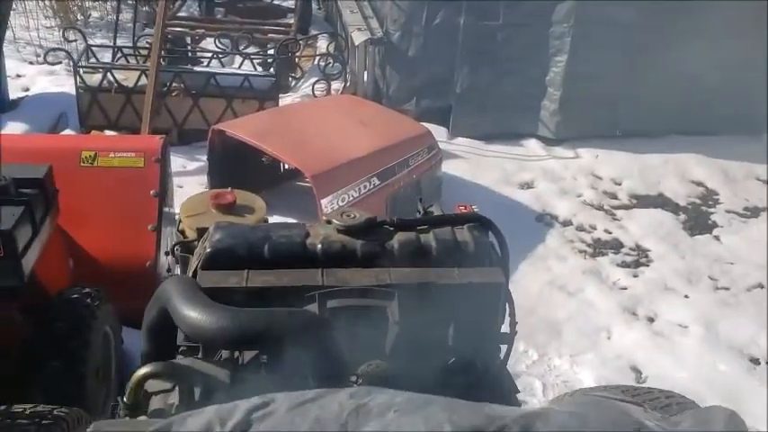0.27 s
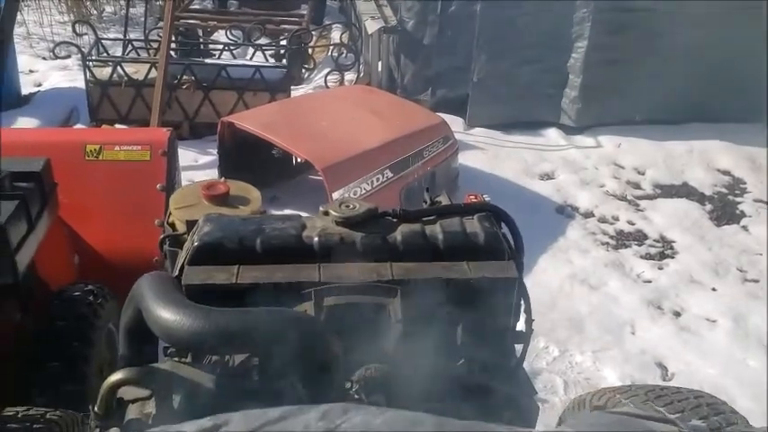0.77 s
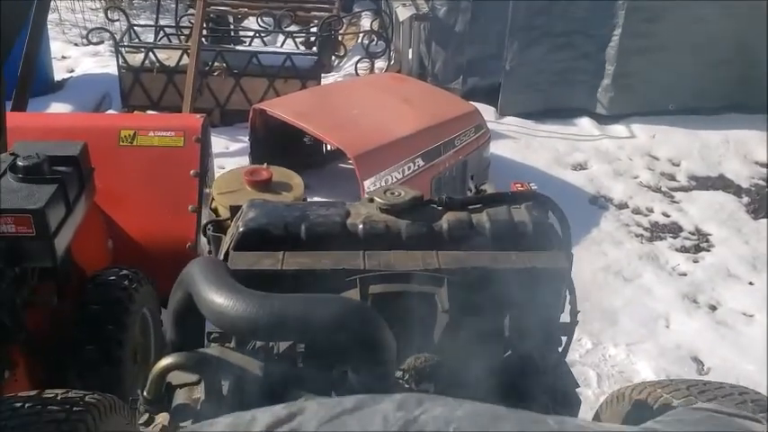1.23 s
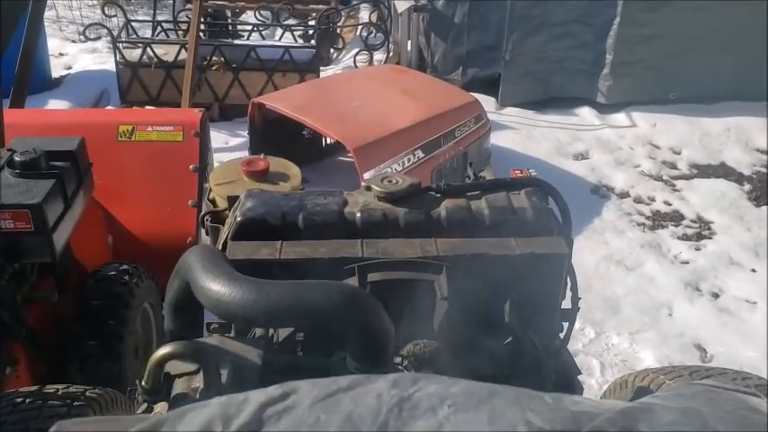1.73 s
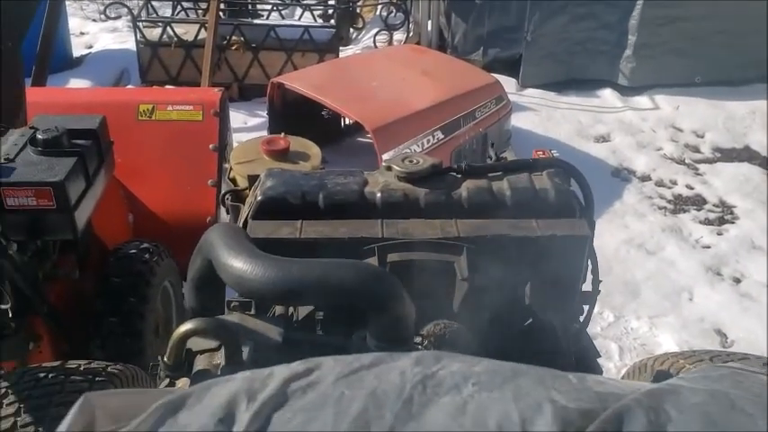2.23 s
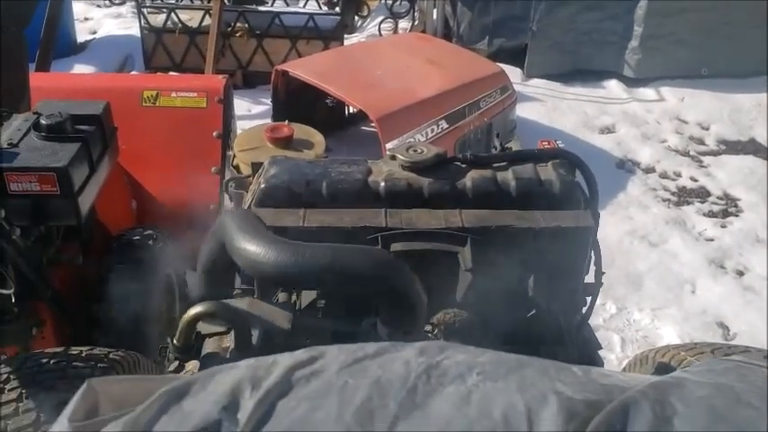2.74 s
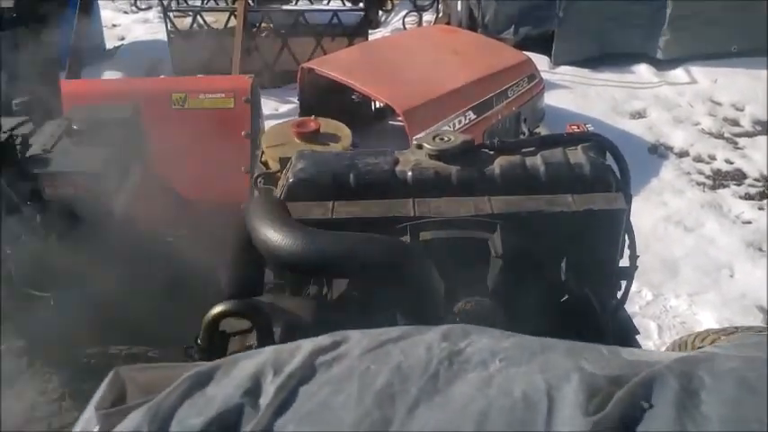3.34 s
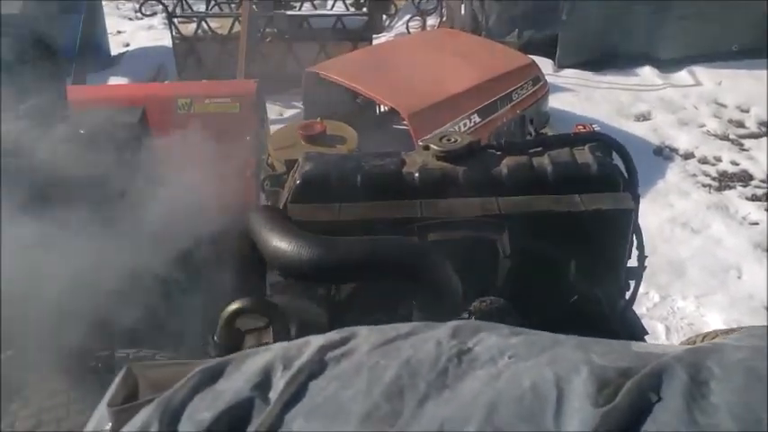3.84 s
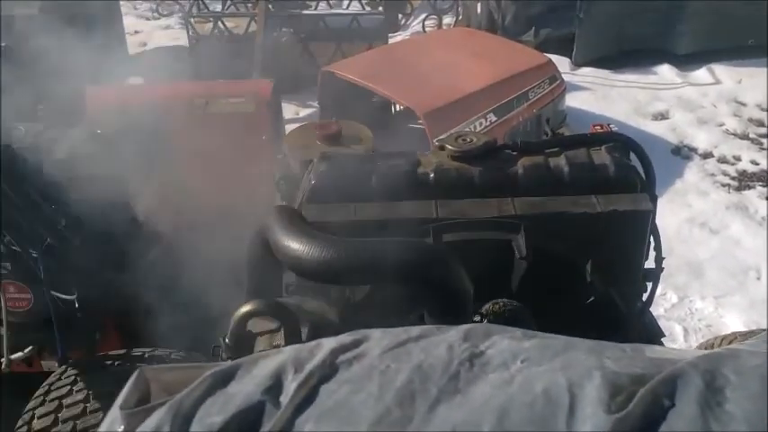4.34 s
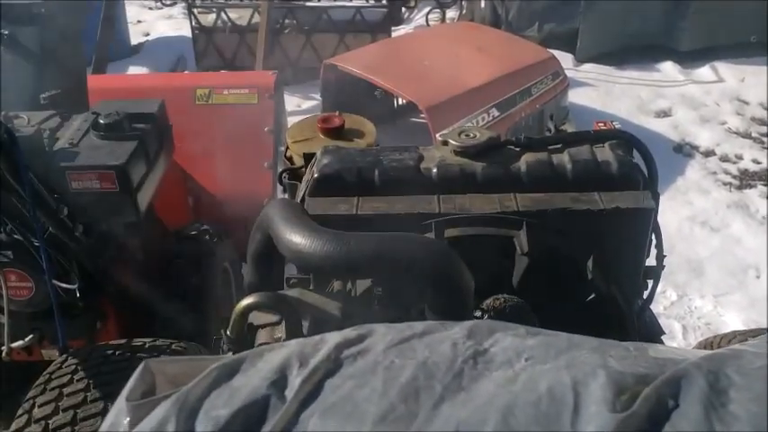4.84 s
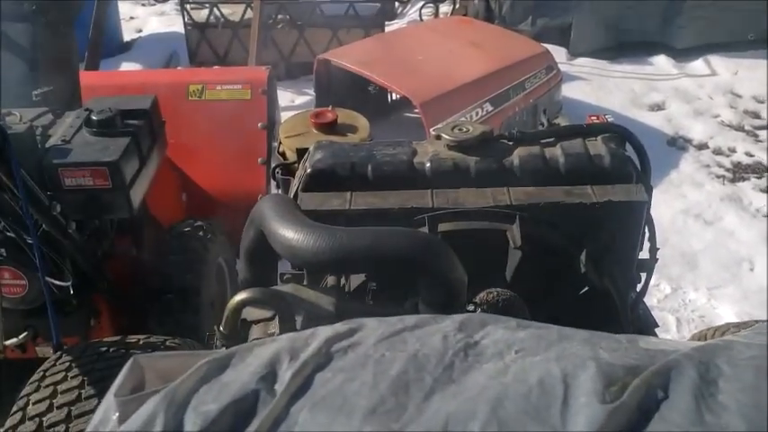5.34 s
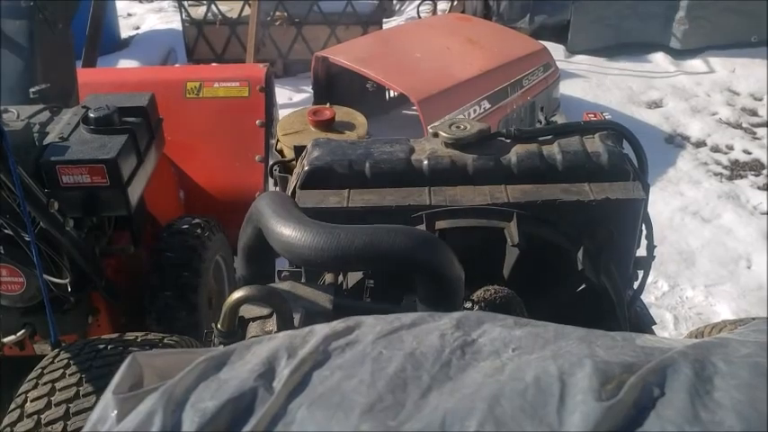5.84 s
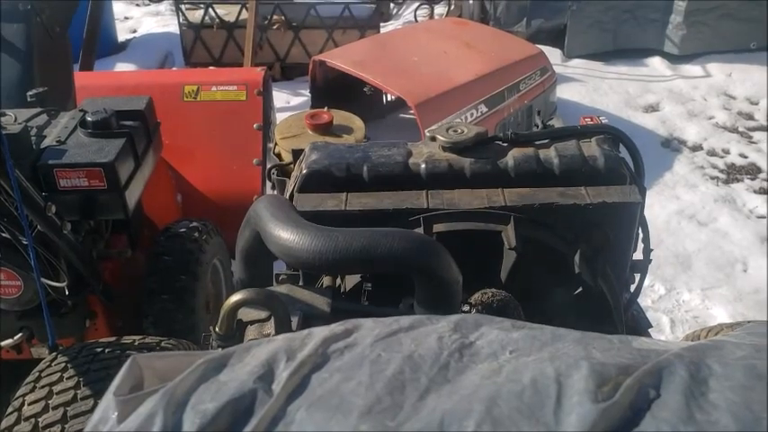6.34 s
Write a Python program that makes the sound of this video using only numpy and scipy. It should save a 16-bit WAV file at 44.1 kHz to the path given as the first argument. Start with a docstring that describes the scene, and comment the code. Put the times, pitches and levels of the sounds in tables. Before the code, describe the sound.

Outdoors, over a low distant drone, a hand rustles softly. Close by, a starter engages and rasps through two slow compressions. The cold diesel engine fires in a short run of knocking, whooping chugs, with jangling panels, sharp metal ticks and a thin high squeal. It slows and dies in weak puffs without catching, leaving the drone and a few faint ticks.

```python
"""Outdoors in the snow, over a low distant drone, a cold diesel engine is cranked close by.
The starter's teeth rasp and howl through two compressions, then the cylinders fire in a short run:
each firing knocks, rings the block, jangles loose panels and sends a rising whoop down the exhaust.
A dry rubbing part squeals thinly, and the engine runs down in weak puffs without catching.
Small metal ticks and the rustle of a hand come before and after."""
import sys
import numpy as np
from scipy import signal
from scipy.fft import rfft, irfft
from scipy.io import wavfile

SR = 44100
rng = np.random.default_rng(int(sys.argv[2]) if len(sys.argv) > 2 else 0)


def log_audio(samples):
    """Write samples as a 16-bit WAV file to the path given in sys.argv[1]."""
    # one column per channel
    frames = np.atleast_2d(samples).T
    # limit to full scale, then quantise
    limited = np.clip(frames, -1, 1)
    pcm = np.round(limited * 32767).astype(np.int16)
    wavfile.write(sys.argv[1], SR, pcm)


N = 291060
TIME = np.arange(N) / SR
FREQS = np.fft.rfftfreq(N, 1 / SR)

# Levels in the tables are relative: each layer sets its own trim on top.
# noise colours of the drone, the hiss and the hand: f/Hz, density/dB
DRONE_COLOUR = [(15, -47), (25, -12), (54, -3), (97, -12.5), (124, -7), (203, -9), (273, -8), (301, -14.5),
                (340, -10.5), (404, -8.5), (543, -6.5), (786, -22.5), (889, -17.5), (1380, -27),
                (9000, -51), (11700, -82), (19800, -120)]
HISS_COLOUR = [(4120, -37), (7000, -22), (8580, -17), (11500, 3.5), (15000, -11.5), (16000, -22)]
RUSTLE_COLOUR = [(2350, -15.5), (4000, -16), (8600, -22.5), (9940, -10), (11700, -2.5), (13300, -10),
                 (15000, -18), (16000, -10)]
# noise colours of metal snaps, valve gear, starter teeth and combustion: f/Hz, density/dB
TICK_COLOUR = [(410, -36), (700, 1.5), (1810, 11.5), (2590, -7), (3610, 9), (4320, -2), (5670, -4.5),
               (8700, -54.5), (12000, -8), (15600, -44), (22000, -120)]
CLATTER_COLOUR = [(350, -40.5), (600, -5), (997, -10), (1510, -6), (1680, -12), (1830, -9), (2040, -9.5),
                  (5050, -11), (8390, -19.5), (11800, -5.5), (12500, -9.5), (13600, -12), (16000, -18.5)]
GEAR_COLOUR = [(290, -42), (500, -19), (688, -16), (893, -6), (1020, -15), (1190, -5), (1300, -21),
               (1480, -9.5), (1930, -23.5), (2500, -19.5), (5020, -20.5), (7420, -33.5), (11800, -22.5),
               (13600, -25), (16000, -39)]
KNOCK_COLOUR = [(260, -34), (450, -2.5), (694, -5.5), (1070, -28), (1750, -18.5), (2260, -16), (2550, -10),
                (3700, -18.5), (4430, -12.5), (4770, -19.5), (5460, -14.5), (8540, -22), (11300, -5.5),
                (16000, -18)]
# stereo placing of the open air, the starter and the engine: f/Hz, left minus right/dB
AIR_PAN = [(60, -5.5), (110, 1.5), (200, -7), (380, -5), (700, -2.5), (1290, 4.5), (2380, 7), (4400, -6.5),
           (8120, -16), (15000, -13.5)]
GEAR_PAN = [(60, -6.0), (110, -1), (200, -5.0), (380, -1), (700, -7), (1290, 2.5), (2380, 11.5),
            (4400, -4.5), (8120, -8), (15000, -6)]
ENGINE_PAN = [(60, -4.5), (110, -2.5), (200, -5.5), (380, -8), (700, -8), (1290, 2), (2380, 6), (4400, -2),
              (8120, -7), (15000, -6.5)]
# how alike the two ears hear a noise: f/Hz, correlation
EAR_LIKENESS = [(60, 0.86), (200, 0.95), (640, 0.66), (1400, 0), (3000, 0), (15000, 0.048)]
# fader ride of the outdoor bed: t/s, level/dB
BED_RIDE = [(0, -46.5), (.5, -43.5), (1.08, -37), (1.9, -36.5), (4.4, -46.5), (6.15, -44), (6.56, -39.5)]
# hum lines on one slow pulse, as from a distant idling motor: harmonic number, level/dB
HUM_LINES = [(5, -13.5), (7, -14), (9, -14), (11, -15.5), (12, -7), (16, -7.5), (17, -17.5), (21, -17),
             (23, -19), (34, -27)]
# spells of handling rustle: t/s, level/dB, length/s
RUSTLE_CUES = [(1.158, -38.5, 0.032), (1.232, -44.5, 0.089), (1.382, -42.5, 0.012), (1.768, -40.5, 0.03),
               (1.83, -44.5, 0.17), (4.08, -58, 0.043), (5.158, -59, 0.023), (5.56, -54, .005)]
# dry metal ticks: t/s, level/dB, left minus right/dB, snap t60/s, ring f/Hz, ring against snap/dB
TICK_CUES = [(0.818, -29.5, -23, 0.01, 1060, -7.5), (2.726, -29, 5, 0.08, 1500, -1),
             (2.873, -24, -3, 0.014, 1790, -12), (3.3699, -19.5, -22, 0.0035, 3600, -17),
             (3.4586, -19, -29, 0.0059, 3680, -30), (3.5643, -19, -17, 0.0076, 4430, -16),
             (3.6642, -35, -11, 0.018, 1480, -22), (4.2875, -50.5, -5, 0.079, 1540, 5),
             (4.587, -51.5, -9, 0.018, 2550, -6), (6.033, -42.5, -9, 0.016, 3760, -4)]
# dull blows to the frame: t/s, level/dB
CLUNK_CUES = [(.8174, -48), (1.961, -27), (2.566, -29.5), (2.728, -33), (4.287, -40.5), (6.034, -45)]
# faint thread of rubbing between the squeals: t/s, level/dB
RUB_RIDE = [(2.78, -58), (3.1, -53), (3.55, -53), (3.67, -43), (3.76, -59), (3.88, -49), (4.0, -57)]
# the chassis shaking: t/s, level/dB
SHAKE_RIDE = [(1.9, -77), (1.97, -35.5), (2.15, -44.5), (2.3, -44), (2.6, -34.5), (3.7, -37), (4.1, -43),
              (4.4, -47.5)]
# clatter as the engine turns, then runs down: t/s, level/dB
CLATTER_RIDE = [(2.48, -48.5), (2.57, -45.5), (3.05, -45.5), (3.6, -50.5), (3.85, -54), (4.12, -61.5),
                (4.32, -79)]
# the starter spinning lightly between compressions: t/s, level/dB
SPIN_RIDE = [(1.94, -57), (2.2, -51), (2.55, -51), (2.62, -46)]
# the starter labouring through compressions: t/s, length/s, level/dB, howl peak t/s, howl level/dB
GRIND_CUES = [(1.957, .2, -34, 2.097, -31), (2.234, 0.15, -32, 2.394, -28)]
# pinion clashing with the ring gear: t/s, level/dB, length/s
CLASH_CUES = [(1.938, -37.5, 0.0054), (1.955, -33, 0.0053), (2.562, -32, 0.018), (2.581, -38.5, 0.021)]
# resonances of the starter housing and the engine block: f/Hz, width/Hz, level/dB
HOUSING_MODES = [(892, 24, -4.5), (1076, 27, -9), (1496, 32, -5.5), (2630, 440, -17), (3560, 73, -15.5),
                 (4140, 24, -15.5), (4660, 44, -15)]
BLOCK_MODES = [(1187, 57, 7.5), (1480, 58, -11), (1695, 28, 3), (2610, 64, 3), (2920, 40, -9),
               (4440, 220, -1.5), (5380, 83, -9.5)]
# strokes that only push air out: t/s, thump level/dB, ring level/dB, pipe f/Hz, ring t60/s
PUFF_CUES = [(2.337, -19, -24.5, 116, 0.35), (3.079, -28, -20, 117.2, 0.24), (3.372, -21, -23.5, 130, 0.5),
             (3.684, -23, -24.5, 123.8, 0.57), (4.043, -26.5, -22.5, 120, .36),
             (4.224, -23.5, -22, 175, 0.079), (4.48, -38, -33, 115, 0.36)]
# firing strokes: t/s, level/dB, pipe f/Hz as the valve opens, stroke length/s, knock/dB, squeal/dB
CHUG_CUES = [(2.533, -27, 129.7, 0.13, -52, -65), (2.6856, -17, 157, 0.083, -25.5, -55),
             (2.8032, -15, 139.5, 0.072, -29, -34), (2.899, -17, 148.2, .063, -32.5, -33.5),
             (2.99, -14.5, 166, 0.051, -21, -39), (3.1831, -17, 150, 0.068, -32.5, -37),
             (3.279, -15.5, 169.7, 0.054, -22, -36), (3.484, -18, 147, 0.0696, -35.5, -53),
             (3.582, -15.5, 166.3, .06, -23, -45), (3.812, -20.5, 144.5, 0.086, -39, -37),
             (3.925, -17.5, 166.2, 0.071, -23, -45)]
# envelope of one exhaust stroke: share of the stroke, level/dB
VALVE_ENVELOPE = [(0, 7.5), (.13, 7), (.3, 5), (.55, 3), (.8, 3), (.92, 0.5), (1.05, -18), (1.3, -12.5),
                  (1.7, -38)]

HARD_KNOCK_DB = -21  # the knock that others are weighed against
GRIND_RISE_S = 0.0053


def amp(db):
    """Decibels to gain."""
    return 10 ** (np.asarray(db) / 20)


def unit(x):
    """Scales a sound so that its mono mix has rms 1."""
    return x / np.sqrt(np.mean(np.atleast_2d(x).mean(0) ** 2) + 1e-20)


def curve(points):
    """A table over frequency, joined on a log axis."""
    hz, value = np.transpose(points)
    return np.interp(np.log(FREQS + 1), np.log(hz + 1), value)


def ride(rows):
    """A fader ride as a gain, silent outside its span."""
    return amp(np.interp(TIME, *np.transpose(rows), left=-200, right=-200))


def pan(db):
    """Left and right gains for a level difference; positive leans left."""
    pair = np.array([amp(np.atleast_1d(db) / 2), amp(-np.atleast_1d(db) / 2)])
    return pair / pair.mean(0)


def wander(rate_hz):
    """A smooth random modulator of rms 1."""
    lowpass = 1 / (1 + (FREQS / rate_hz) ** 4)
    return unit(irfft(rfft(rng.standard_normal(N)) * lowpass, N))


def ringing(modes):
    """Gain over frequency of resonances given as f/Hz, width/Hz, level/dB."""
    powers = (amp(db) ** 2 / (1 + (2 * (FREQS - hz) / width) ** 2) ** 2 for hz, width, db in modes)
    return np.sqrt(sum(powers))


def noise(gain, placing):
    """Coloured stereo noise, alike at both ears in the bass."""
    left, other = rfft(rng.standard_normal((2, N)))
    likeness = curve(EAR_LIKENESS)
    right = likeness * left + np.sqrt(1 - likeness ** 2) * other
    return unit(irfft(np.array([left, right]) * gain * pan(curve(placing)), N))


def bursts(rows, rise_s, fall_s):
    """Attack, hold and decay envelopes for cues given as t/s, level/dB, length/s."""
    return sum(amp(db) * np.clip((TIME - s) / rise_s, 0, 1)
               * np.exp(-np.maximum(TIME - s - length, 0) / fall_s) for s, db, length in rows)


def add(mix, s, sound):
    """Mixes a sound in at a time."""
    part = mix[round(s * SR):][:len(sound)]
    part += sound[:len(part)]


def firings(lead_s=0.012, lead_s_per_db=.00022):
    """Time and level of each combustion knock; a harder one comes earlier before the valve opens."""
    return [(s - lead_s - lead_s_per_db * (db - HARD_KNOCK_DB), db) for s, _, _, _, db, _ in CHUG_CUES]


def outdoors(drone_db=-1.3, hiss_db=-26, pulse_hz=25.65, drift=0.00301, waver=.22):
    """The bed: a distant drone with gently wavering hum lines, and a thin hiss that swells with it."""
    turns = pulse_hz * np.cumsum(1 + drift * wander(rate_hz=2.09)) / SR
    hum = np.zeros(N)
    for harmonic, db in HUM_LINES:
        gain = amp(db) * np.sqrt(2) * (1 + waver * wander(rate_hz=2.6))
        hum += gain * np.sin(2 * np.pi * (harmonic * turns + rng.random()))
    drone = amp(drone_db) * noise(amp(curve(DRONE_COLOUR)), AIR_PAN)
    hiss = noise(amp(curve(HISS_COLOUR)), AIR_PAN) * amp(hiss_db + 1.4 * wander(rate_hz=23))
    swell = amp(np.interp(TIME, *np.transpose(BED_RIDE)))
    return swell * (drone + hiss + pan(-7.0) * hum)


def rustles(trim_db=-2.5, grain_db=5):
    """Crisp little scrapes of a hand, close on the right."""
    grains = unit(amp(grain_db * np.minimum(wander(rate_hz=180), 1.8)))
    friction = noise(amp(curve(RUSTLE_COLOUR)), AIR_PAN) * grains
    return amp(trim_db) * friction * bursts(RUSTLE_CUES, rise_s=0.0016, fall_s=0.01)


def ticks(trim_db=-5, ring_t60=0.06):
    """Loose metal parts snap once and ring briefly at one pitch."""
    centred = [(100, 0), (10000, 0)]
    bright = noise(amp(curve(TICK_COLOUR)), centred)
    out = np.zeros((2, N))
    for s, db, pan_db, snap_t60, hz, ring_db in TICK_CUES:
        age = np.clip(TIME - s, 0, 1)
        snap = bright * amp(-60 * age / snap_t60) * (age > 0)
        ring = amp(ring_db - 60 * age / ring_t60) * np.sin(2 * np.pi * hz * age)
        out += pan(pan_db) * amp(db + trim_db) * (snap + ring)
    return out


def clunks(trim_db=-4, knock_db=-12, delay_s=0.0075, hold_s=.006):
    """Heavier blows and the combustion knocks shake a dull clunk out of the frame."""
    frame = noise(ringing([(324, 180, 1), (565, 89, -2), (806, 90, -2), (1123, 200, -4)]), ENGINE_PAN)
    blows = list(CLUNK_CUES) + [(s + delay_s, db + knock_db) for s, db in firings()]
    envelope = bursts([(s, db, hold_s) for s, db in blows], rise_s=0.0014, fall_s=0.022)
    return amp(trim_db) * frame * envelope


def steel_chatter(hz, spread_octaves, ring_s, count):
    """A brief chatter on thin steel: a random handful of modes around one pitch."""
    t = np.arange(SR // 12) / SR
    detune, size, phase, late = rng.standard_normal((4, count, 1))
    age = np.maximum(t - .003 * abs(late), 0)
    mode_hz = np.minimum(hz * 2 ** (spread_octaves * detune), SR / 3)
    modes = amp(2 * size) * np.sin(2 * np.pi * (mode_hz * age + phase))
    envelope = np.minimum(age / 0.0032, 1) * np.exp(-age / ring_s)
    return np.sum(modes * envelope, 0) / np.sqrt(count)


def jangles(trim_db=5, panel_hz=2352, clash_hz=2400, scatter_octaves=.12, rebound_s=.04, rebound_db=-7):
    """Firings, late gear clashes and puffs shake loose panels, differently each time and at each ear."""
    def clatter_db(s):
        """Level of the turning engine: the panels settle as it runs down."""
        return np.interp(s, *np.transpose(CLATTER_RIDE))
    struck = [(s, clatter_db(s) + 15 + .2 * (db - HARD_KNOCK_DB), panel_hz) for s, db in firings()[1:]]
    fallen_back = [(s + rebound_s, db + rebound_db, hz) for s, db, hz in struck]
    clashed = [(s, db + 2, clash_hz) for s, db, _ in CLASH_CUES[2:]]
    puffed = [(s + rebound_s, clatter_db(s) + 4, panel_hz) for s, *_ in PUFF_CUES]
    out = np.zeros((2, N))
    for s, db, hz in struck + fallen_back + clashed + puffed:
        hz = hz * 2 ** (scatter_octaves * rng.standard_normal())
        for ear in out:
            chatter = steel_chatter(hz, spread_octaves=0.28, ring_s=0.0065, count=10)
            add(ear, s + .002, amp(db + trim_db) * chatter)
    return pan(7.9) * out


def squeal(trim_db=-2, hz=12625, width_hz=150, delay_s=0.028, stroke_share=0.26, lead_s=0.028):
    """A dry rubbing part sings one very high note in snatches, in step with the strokes."""
    note = noise(ringing([(hz, width_hz, 0)]), ENGINE_PAN)
    after_valve = [(s + delay_s, db, stroke_share * stroke) for s, _, _, stroke, _, db in CHUG_CUES]
    # a fainter chirp ahead of the firing, only while the engine turns fastest
    before_firing = [(s - lead_s, db - 5, .011) for s, *_, db in CHUG_CUES[3:9]]
    snatches = bursts(after_valve + before_firing, rise_s=0.0018, fall_s=0.0056)
    thread = ride(RUB_RIDE) * unit(amp(1.5 * wander(rate_hz=30)))
    return amp(trim_db) * note * (snatches + thread)


def clatter(grain_db=2.0, sing_db=-10.0):
    """Valve gear rattles while the engine turns, the block sings faintly, and the chassis shakes."""
    rattle = noise(amp(curve(CLATTER_COLOUR)), ENGINE_PAN) * unit(amp(grain_db * wander(rate_hz=135)))
    sing = noise(ringing([(1515, 50, 7.0), (4670, 81, -6.0), (5070, 110, -5)]), ENGINE_PAN)
    sing *= unit(amp(3.3 * wander(rate_hz=12)))
    chassis = noise(ringing([(56.7, 38, 6.0), (135, 230, 1.0), (243, 280, 2.0)]), ENGINE_PAN)
    return ride(CLATTER_RIDE) * (rattle + amp(sing_db) * sing) + ride(SHAKE_RIDE) * chassis


def starter_load(swell_db=1.5):
    """The load on the starter sets in quickly, grows through each compression and then lets go."""
    load = ride(SPIN_RIDE)
    for s, length, db, _, _ in GRIND_CUES:
        progress = np.clip((TIME - s) / length, 0, 1)
        grind = bursts([(s, db, length)], GRIND_RISE_S, fall_s=0.066)
        load = np.maximum(load, amp(swell_db * (progress - 1)) * grind)
    return load


def starter_scrape(trim_db=-0.5, scatter_db=1.8, span_s=(1.96, 2.45), catches=55):
    """Teeth catch at random moments while the starter grinds."""
    out, load = np.zeros((2, N)), starter_load()
    for s, chance in zip(rng.uniform(*span_s, catches), rng.standard_normal(catches)):
        gain = amp(trim_db + scatter_db * chance) * load[int(s * SR)]
        for ear in out:
            add(ear, s, gain * steel_chatter(hz=2700, spread_octaves=0.65, ring_s=0.0063, count=4))
    return pan(3.9) * out


def starter_howl(free_hz=1075, loaded_hz=861, sag_s=0.0295, recover_s=0.027,
                 swell_db_per_s=133, fade_db_per_s=330, jitter=0.0398, rough=0.66, left_lead_s=0.0002):
    """Meshing teeth sing a rough note that sags under load and recovers past the compression."""
    out, flutter = np.zeros((2, N)), 1 + jitter * wander(rate_hz=170)
    for s, length, _, peak_s, db in GRIND_CUES:
        sag = np.exp(-np.maximum(TIME - s, 0) / sag_s)
        recovery = np.clip((TIME - s - length) / recover_s + .5, 0, 1)
        hz = (loaded_hz + (free_hz - loaded_hz) * (sag + recovery)) * flutter
        turns = np.cumsum(hz) / SR + hz * left_lead_s * np.array([[1], [0]])
        below_peak_db = np.maximum(swell_db_per_s * (peak_s - TIME), fade_db_per_s * (TIME - peak_s))
        attack = np.clip((TIME - s) / GRIND_RISE_S, 0, 1)
        out += amp(db - below_peak_db) * attack * np.sqrt(2) * np.sin(2 * np.pi * turns)
    return pan(-2) * out * (1 + rough * wander(rate_hz=130))


def starter_rasp(rasp_db=-4.5, housing_db=-9, clash_db=1, shaft_hz=36, tooth_hz=130, bite=0.21):
    """Pinion teeth rasp on the ring gear, throbbing once a turn, and ring the housing."""
    uneven_time = np.cumsum(1 + 0.05 * wander(rate_hz=7.4)) / SR
    throb = 1 + 0.14 * np.sin(2 * np.pi * shaft_hz * uneven_time)
    tooth_phase = tooth_hz * uneven_time % 1
    teeth = unit(1 - bite + bite * 3 * np.exp(-tooth_phase / 0.71))
    load = starter_load() * throb
    clash = amp(clash_db) * bursts(CLASH_CUES, rise_s=0.0012, fall_s=0.0074)
    rasp = noise(amp(curve(GEAR_COLOUR)), GEAR_PAN) * teeth * (amp(rasp_db) * load + clash)
    return rasp + amp(housing_db) * load * noise(ringing(HOUSING_MODES), GEAR_PAN)


def block_ring(trim_db=-18, scatter_db=4, delay_s=0.0064):
    """Each knock sets the modes of the engine block ringing in a new mixture."""
    out, t = np.zeros((2, N)), np.arange(SR // 5) / SR
    attack = np.minimum(t / delay_s, 1)
    for s, db in firings():
        for ear in out:
            chance = rng.standard_normal((len(BLOCK_MODES), 2))
            modes = sum(amp(mode_db + scatter_db * size) * np.exp(-np.pi * width * t)
                        * np.sin(2 * np.pi * (hz * t + phase))
                        for (hz, width, mode_db), (size, phase) in zip(BLOCK_MODES, chance))
            add(ear, s + delay_s, amp(db + trim_db) * modes * attack)
    return out


def knocks(trim_db=-5.0, treble_db=1.0, split_hz=8000, rise_s=0.006, hold_s=0.0077, linger_s=0.0024,
           grain_db=2.0, tail_db=-10.5):
    """Each firing cracks, collapses and leaves a weaker tail; the mids linger longer than the treble."""
    crack = noise(amp(curve(KNOCK_COLOUR)), ENGINE_PAN) * unit(amp(grain_db * wander(rate_hz=500)))
    highpass = 1 / (1 + (split_hz / (FREQS + 1)) ** 8)
    treble = irfft(rfft(crack) * highpass, N)
    out = np.zeros((2, N))
    for band, length in ((crack - treble, hold_s + linger_s), (amp(treble_db) * treble, hold_s)):
        cues = [(s, db, length) for s, db in firings()]
        hit = bursts(cues, rise_s, fall_s=0.0046)
        tail = amp(tail_db) * bursts(cues, rise_s, fall_s=0.033)
        out += band * (hit + tail)
    return amp(trim_db) * out


def thump(t, centre_s, width_s):
    """A slug of gas leaves the pipe: a push, then a suck."""
    u = (t - centre_s) / width_s
    return -u * np.exp((1 - u ** 2) / 2)


def puffs():
    """Unfired strokes thump, and the pipe rings at its own low pitch."""
    out = np.zeros(N)
    for s, thump_db, ring_db, hz, t60 in PUFF_CUES:
        age = np.maximum(TIME - s, 0)
        out += amp(thump_db) * thump(TIME - s, centre_s=0.0044, width_s=0.0022)
        out += amp(ring_db - 60 * age / t60) * np.sin(2 * np.pi * hz * age)
    return out


def chugs(closed_hz=288, heat=0.63, bend=2.446, piston_top=1.12, octave_db=-31,
          overtone_hz=385, overtone_t60=0.17, sweet_spot_hz=138.5, rush_db=-25.0, rough=0.06):
    """Cylinder and pipe ring together; the rising piston shrinks the volume, so the pitch whoops up."""
    out, flow, preroll_s = np.zeros(N), np.zeros(N), .01
    t = np.arange(SR // 4) / SR - preroll_s
    age = np.maximum(t - .0006, 0)
    usual_hz = np.mean([row[2] for row in CHUG_CUES])
    for s, db, open_hz, stroke_s, knock_db, _ in CHUG_CUES:
        progress = age / stroke_s
        piston = np.maximum(piston_top - abs(progress - piston_top), 0)  # rises, then sinks again
        shut_hz = closed_hz * (open_hz / usual_hz) ** heat  # hotter gas lifts the whole sweep
        sweep_hz = open_hz + (shut_hz - open_hz) * piston ** bend
        turns = np.cumsum(sweep_hz * (age > 0)) / SR
        valve_db = np.interp(progress, *np.transpose(VALVE_ENVELOPE), right=-100)
        opening = amp(valve_db) * np.minimum(age / 0.002, 1)
        whoop = opening * (np.sin(2 * np.pi * turns) + amp(octave_db) * np.sin(4 * np.pi * turns))
        # the pipe overtone answers best to strokes that open near one pitch
        overtone_db = -5.5 - 0.8 * abs(open_hz - sweet_spot_hz)
        overtone = amp(overtone_db - 60 * age / overtone_t60) * np.sin(2 * np.pi * overtone_hz * age)
        thump_db = max(1.5 + 0.7 * (knock_db - HARD_KNOCK_DB), -5)  # harder knock, stronger thump
        punch = amp(thump_db) * thump(t, centre_s=0.0032, width_s=0.0032)
        add(out, s - preroll_s, amp(db) * (whoop + overtone + punch))
        add(flow, s - preroll_s, amp(db) * opening * np.exp(-progress))
    rush_colour = ringing([(328, 100, 0.0), (540, 180, -13.0), (800, 200, -15.5)])
    rush = noise(rush_colour, ENGINE_PAN).mean(0)  # gas tumbling past the valve
    return out * (1 + rough * wander(rate_hz=92)) + amp(rush_db) * flow * rush


def exhaust(left_lead_s=0.00022):
    """Fired and unfired strokes leave the pipe and reach the left ear first."""
    arrival = np.exp(1j * np.pi * FREQS * left_lead_s * np.array([[1], [-1]]))
    return irfft(rfft(chugs() + puffs()) * pan(curve(ENGINE_PAN)) * arrival, N)


def scene():
    """The mix: engine, loose parts and starter up front, the outdoor bed behind."""
    engine = exhaust() + knocks() + block_ring() + clatter() + squeal()
    loose_parts = ticks() + jangles() + clunks()
    starter = starter_rasp() + starter_howl() + starter_scrape()
    return engine + loose_parts + starter + rustles() + outdoors()


def record(dry, low_cut_hz=49, high_cut_hz=15900):
    """Rolls off the deep bass and cuts the very top."""
    thinned = irfft(rfft(dry) / np.sqrt(1 + (low_cut_hz / (FREQS + 1)) ** 8), N)
    lowpass = signal.firwin(511, high_cut_hz, window=("kaiser", 9), fs=SR)
    return signal.oaconvolve(thinned, lowpass[None], "same")


dry = scene()
out = record(dry)
log_audio(out)
```